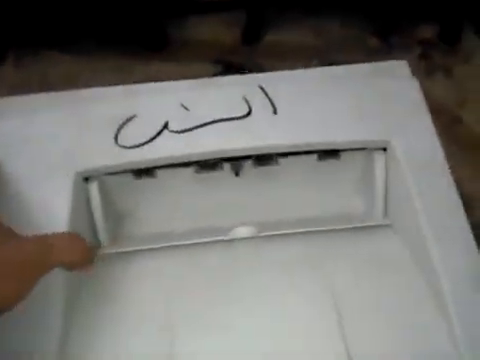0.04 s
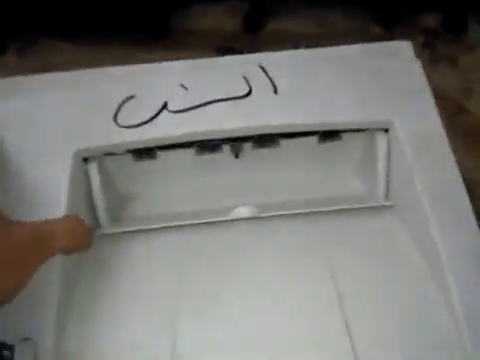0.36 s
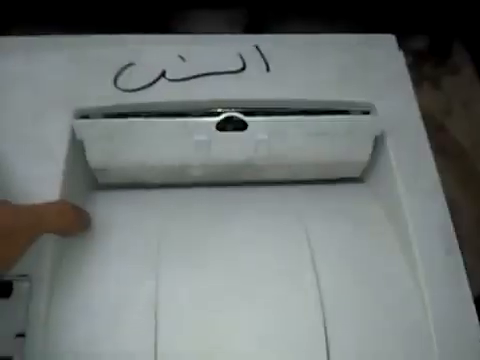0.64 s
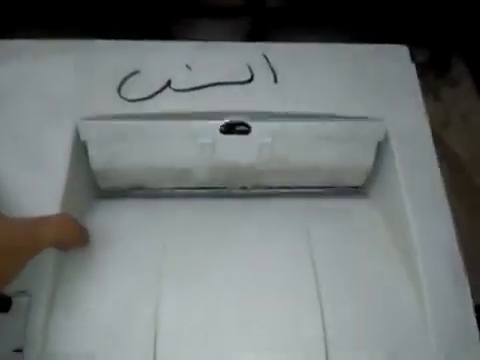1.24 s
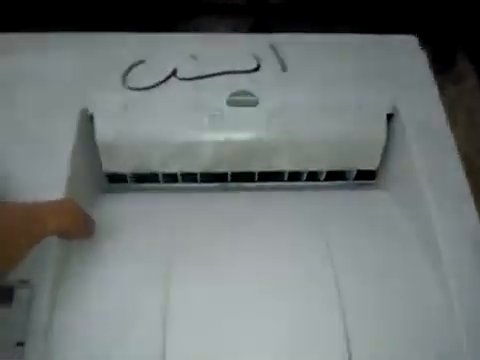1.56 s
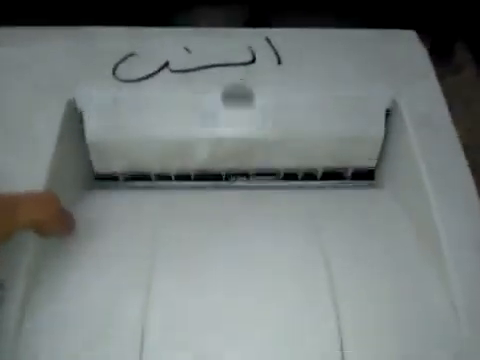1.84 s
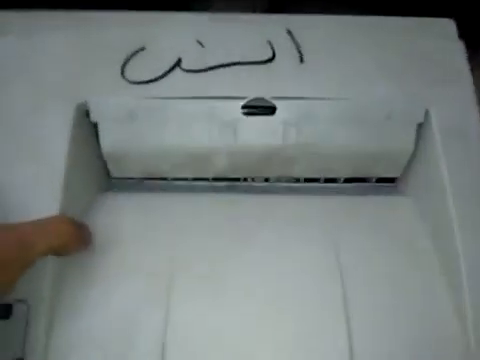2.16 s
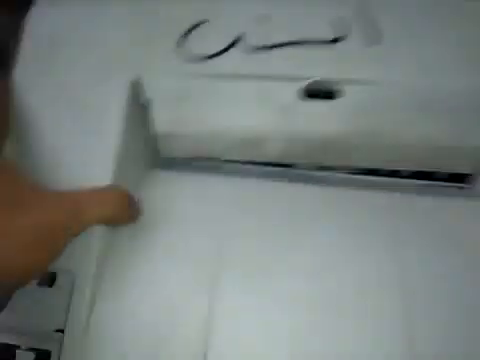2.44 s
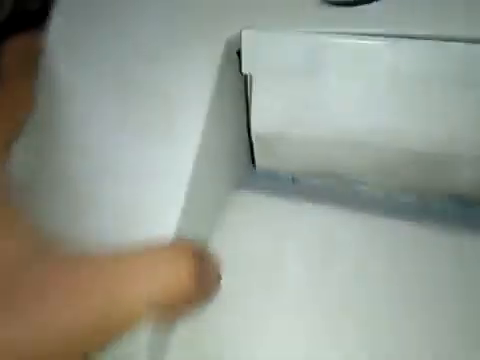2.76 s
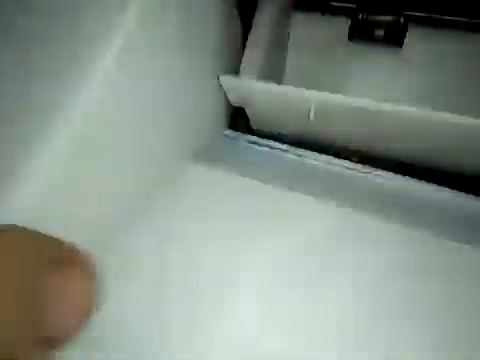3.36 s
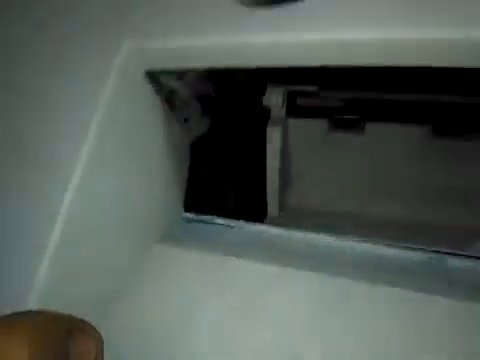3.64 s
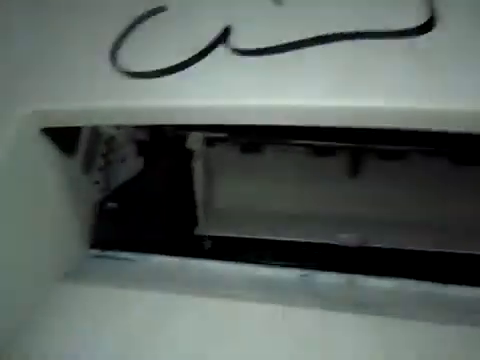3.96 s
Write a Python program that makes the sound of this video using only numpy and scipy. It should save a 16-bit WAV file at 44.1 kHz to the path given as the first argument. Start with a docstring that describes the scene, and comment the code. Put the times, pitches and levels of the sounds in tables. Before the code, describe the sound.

A loose plastic printer flap is worked by hand, close up in a small room. Faint scrapes and bumps come first, over a low handling rumble. From about 1 second it clicks, knocks and scrapes unevenly against the hollow casing, harder around 2 seconds. A loud rattling burst begins near 3.3 seconds. At 3.6 the flap snaps free with a thin ring, then drops inside, teeters and clatters to rest.

```python
"""A loose plastic printer flap is worked by hand, close to the microphone in a small room.
It starts with faint stick-slip scrapes and bumps over a handling rumble. From about one second it
knocks, clicks and scrapes harder on the casing, each point of contact colouring the shell differently.
Near 3.6 s it is forced free with a snap that leaves a thin ring, then drops inside, teeters and settles."""
import sys
import numpy as np
from scipy import signal
from scipy.fft import rfft, irfft, next_fast_len
from scipy.io import wavfile
from scipy.ndimage import uniform_filter1d, minimum_filter1d

SR = 44100
rng = np.random.default_rng(int(sys.argv[2]) if len(sys.argv) > 2 else 0)


def digitize_waveform(pressure):
    """Quantize a signal to 16-bit integers and store it at the path in sys.argv[1].

    Rows of a 2-D input are taken as channels; values are limited to [-1, 1].
    """
    field = np.atleast_2d(pressure).T
    bounded = np.clip(field, -1, 1)
    quanta = np.round(bounded * 32767).astype(np.int16)
    wavfile.write(sys.argv[1], SR, quanta)


N = 176400
TIME = np.arange(N) / SR
HIT_TIME = np.arange(SR // 3) / SR  # seconds into one contact

# The shell's four registers: thump, body, clack, tick. Each row: low and high edge in Hz, attack in
# seconds, multiplier on a knock's decay time, knock gain in dB, scrape gain in dB, room send in dB.
REGISTERS = [(30, 416, 0.0036, 1.4, -0.5, -2.5, -6), (324, 1935, 0.00073, 1.174, 0.5, -2.5, -11.5),
             (1568, 4870, 0.0015, 0.9, 2, -2.5, -13), (5450, 22000, 0.00021, 0.8, 1.5, 0, -23)]


def amp(db):
    """Decibels to gain."""
    return 10 ** (np.asarray(db) / 20)


def unit(x):
    """Scale to rms 1."""
    return x / np.sqrt(np.mean(x ** 2) + 1e-20)


def along(points, hz):
    """Read (Hz, value) points on a log axis."""
    freqs, values = np.transpose(points)
    return np.interp(np.log(hz + 1), np.log(freqs + 1), values)


def filtered(x, response):
    """Equalise x with a gain curve over frequency."""
    n = x.shape[-1]
    size = next_fast_len(n + SR // 10)
    return irfft(rfft(x, size) * response(np.fft.rfftfreq(size, 1 / SR)), size)[..., :n]


def noise(spectrum):
    """Noise of rms 1 with the given colour."""
    return unit(filtered(rng.standard_normal(N), lambda hz: amp(along(spectrum, hz))))


def add(track, start, x):
    """Mix x into the track at start seconds."""
    i = max(round(start * SR), 0)
    track[i:i + len(x)] += x[:max(N - i, 0)]


def noise_floor(level_db=-74.5):
    """A faint, steady, bass-heavy bed of noise."""
    # Each row: frequency in Hz, relative level in dB.
    colour = [(25, -6.5), (54, -4.5), (200, -9.5), (1330, -21), (2030, -23), (5400, -31), (14000, -28.5)]
    return amp(level_db) * noise(colour)


def handling_rumble():
    """Deep handling noise that swells and sinks."""
    # Each row: time in seconds, level in dB.
    fader = [(0.0, -85), (0.09, -57), (0.59, -71.5), (0.67, -97), (1.06, -48), (1.12, -73), (2.91, -53.5),
             (2.97, -72), (3.41, -45), (4.0, -65.5)]
    # Each row: frequency in Hz, relative level in dB.
    colour = [(12, -23), (25, 4), (42, -4.5), (60, 8), (110, -21.5), (400, -71.5)]
    return amp(np.interp(TIME, *np.transpose(fader))) * noise(colour)


def shell_modes(lo_hz, hi_hz, places=32, pitch_scatter=0.027, lift_scatter_db=2.5):
    """The shell's dense modes in one register, as coloured noise: one row per point of contact."""
    # The plastic's overall tone. Each row: frequency in Hz, relative level in dB.
    colour = [(25, -27), (45, -15), (72, 2), (115, -5), (154, -10.5), (193, 2), (320, -8.5), (450, -6),
              (750, -3), (1240, 6.5), (1700, -5.5), (3000, -10), (4270, -8), (5100, -9), (7230, -12.5),
              (9500, -12), (12000, -17), (14300, -47)]
    # Its resonances and one dip. Each row: centre in Hz, width in Hz, lift in dB.
    resonances = [(436, 19, 9), (642, 89, 5.5), (1360, 410, -9.5), (2125, 320, 3.5), (2765, 92, 7.5),
                  (3376, 240, 6), (4260, 700, 4), (5520, 150, 5)]
    shifts, lifts = rng.standard_normal((2, len(resonances), places, 1))

    def response(hz):
        lift_db = 0
        for (centre, width, db), shift, lift in zip(resonances, shifts, lifts):
            off_centre = 2 * (hz - centre * (1 + pitch_scatter * shift)) / width
            lift_db += (db + lift_scatter_db * lift) / (1 + off_centre ** 2)
        band = ((1 + (lo_hz / (hz + 1)) ** 8) * (1 + (hz / hi_hz) ** 8)) ** -.5
        return amp(along(colour, hz) + lift_db) * band
    return unit(filtered(rng.standard_normal((places, len(HIT_TIME))), response))


def shell_hit(modes, attack_s, t60, wall_max_s=0.0009, wall_gain=0.55):
    """The shell rings out from a random point of contact, coloured by a bounce off a nearby wall."""
    place, offset, path, polarity = rng.random(4)
    env = amp(-60 * HIT_TIME / t60) * (1 - np.exp(-HIT_TIME / attack_s))
    direct = np.roll(modes[int(place * len(modes))], -int(offset * len(HIT_TIME) / 2)) * env
    bounce = np.roll(direct, int(SR * wall_max_s * (1 + path) / 2))
    hit = direct + wall_gain * np.sign(polarity - .5) * bounce
    return hit * np.sqrt(np.sum(env ** 2) / np.sum(hit ** 2))


def stick_slip(jerks_per_s=1300, scatter_db=3.5):
    """The edge grips and lets go: randomly timed jerks of uneven size."""
    slips = rng.random(N) < jerks_per_s / SR
    sizes = amp(scatter_db * np.clip(rng.standard_normal(N), -2, 2))
    return slips * sizes * rng.choice([-1, 1], N)


def rubbing(modes, jerks, register, segments=140):
    """Jerks excite the shell; the point of contact wanders, so the colour keeps changing."""
    # A jerk's t60 in seconds, per register: the treble dies first.
    decays = [0.038, 0.044, 0.035, 0.02]
    # Exponent on a jerk's size, per register: only hard jerks tick.
    hardness = [0.9, 1.05, 1.3, 1.6]
    out, step = np.zeros(N), N // segments
    attack_s = REGISTERS[register][2]
    train = np.sign(jerks) * np.abs(jerks) ** hardness[register]
    for i in range(0, N, step):
        hit = shell_hit(modes, attack_s, decays[register])[:SR // 10]
        add(out, i / SR, signal.fftconvolve(train[i:i + step], hit))
    return unit(out)


def scrapes(modes, jerks, register, rise_s=0.012, fall_s=0.013, swell_share=0.067):
    """While the flap slides, the rubbing swells, holds and fades."""
    # Scrapes and loose chatter. Each row: start and end in seconds, then thump, body, clack and tick
    # levels in dB before the register's gain.
    slides = [(0.045, 0.386, -65, -73, -70, -76.5), (0.168, 0.276, -53, -53.5, -58, -67),
              (0.53, 0.566, -61, -70, -74, -81), (0.969, 1.166, -45.5, -39, -39, -74),
              (1.033, 1.083, -47, -37, -43, -45.5), (1.143, 1.24, -49.5, -52, -47.5, -53),
              (1.278, 1.48, -53.5, -51.5, -42.5, -51.5), (1.472, 1.503, -39.5, -35, -35, -37),
              (1.524, 1.813, -50, -53.5, -52.5, -59.5), (1.665, 1.708, -66, -39, -37.5, -37),
              (1.805, 1.867, -43, -49, -44, -44), (1.877, 1.95, -47.5, -47, -50, -50.5),
              (1.94, 1.976, -48, -35.5, -38, -40), (1.97, 2.038, -34, -25, -22.5, -31.5),
              (2.064, 2.114, -45.5, -52, -47.5, -60), (2.085, 2.264, -53, -55.5, -52.5, -82),
              (2.247, 2.323, -66, -40.5, -39, -46), (2.335, 2.405, -46, -42, -50, -72),
              (2.408, 2.727, -49.5, -59.5, -53.5, -71), (2.574, 2.621, -36.5, -39, -50, -44),
              (2.73, 2.77, -51, -51, -41.5, -39), (2.754, 2.896, -47, -57, -59, -73),
              (3.011, 3.256, -50.5, -59.5, -69, -73), (3.114, 3.123, -38.5, -46, -51, -40.5),
              (3.24, 3.273, -37.5, -37.5, -42, -49), (3.306, 3.37, -42, -47, -42, -48),
              (3.353, 3.397, -25, -27, -30, -40), (3.386, 3.495, -32.5, -29, -23, -24.5),
              (3.494, 3.541, -44, -26, -25, -27), (3.576, 3.595, -46, -54, -22.5, -32),
              (3.606, 3.679, -47, -36, -29.5, -33.5), (3.665, 3.793, -52.5, -57, -51, -83),
              (3.83, 3.904, -54, -37, -39.5, -37.5), (3.92, 4.004, -63, -50.5, -55, -77)]
    power = np.zeros(N)
    for start, end, *levels in slides:
        length = max(end - start, rise_s)
        t = TIME[:int(length * SR) + len(HIT_TIME)]
        swell_s = swell_share * length  # longer scrapes swell and fade more slowly
        fade_in = np.minimum(t / (rise_s + swell_s), 1)
        fade_out = np.exp(-np.maximum(t - length + swell_s, 0) / (fall_s + swell_s / 2))
        add(power, start, (fade_in * fade_out * amp(levels[register])) ** 2)
    return np.sqrt(power) * rubbing(modes, jerks, register)


def casing_thump(detune=0.059, scatter_db=2):
    """The low modes of the casing, a little different for each blow."""
    # Each row: pitch in Hz, relative level in dB, t60 in seconds.
    low_modes = [(70.3, -5.5, 0.13), (109, -5, 0.092), (184.8, -3, 0.07), (257, -3.5, 0.077)]
    out = np.zeros(len(HIT_TIME))
    for k, (hz, db, t60) in enumerate(low_modes):
        env = amp(db + scatter_db * rng.standard_normal() - 60 * HIT_TIME / t60)
        pitch = hz * (1 + detune * rng.standard_normal())
        out += (-1) ** k * env * np.sin(2 * np.pi * pitch * HIT_TIME)
    return out


def knock_ring(hz, t60, spread=0.0332, scatter_db=9, damping=1.38):
    """Three close modes, struck together and beating against each other."""
    detune, scatter = rng.standard_normal((2, 3, 1))
    pitches = hz * (1 + spread * (np.array([[-1], [0], [1]]) + detune / 3))
    env = amp(-60 * damping * HIT_TIME / t60) * (1 - np.exp(-HIT_TIME * hz / 2))
    cluster = env * np.sum(amp(scatter_db * scatter) * np.sin(2 * np.pi * pitches * HIT_TIME), axis=0)
    return cluster * np.linalg.norm(env) / np.linalg.norm(cluster)


def knocks(modes, register):
    """Each contact thumps the casing and excites the dense modes, with one ring standing out."""
    # Each row: start in seconds, thump, body, clack and tick levels in dB, ring pitch in Hz, ring level
    # in dB, base t60 in seconds. Levels are before the register's gain.
    contacts = [(0.084, -45, -66, -91, -78, 236, -65, 0.1), (0.525, -47, -57, -78, -80, 1107, -55, 0.06),
                (0.972, -46, -35.5, -53, -75, 856, -49, 0.066),
                (0.994, -62, -45, -27.5, -67.5, 4220, -26, 0.05),
                (1.003, -67, -50, -42, -68, 3415, -28, 0.068),
                (1.082, -58, -49, -30, -63, 3800, -32, 0.034),
                (1.094, -63, -46, -33.5, -62, 1985, -27.5, 0.051),
                (1.181, -40, -32, -54, -42, 1160, -34.5, 0.06),
                (1.186, -62, -29.5, -36, -36.5, 3230, -31.5, 0.063),
                (1.310, -62, -60, -33.5, -34, 4720, -35, 0.13),
                (1.324, -68, -37, -25, -24.5, 4420, -20.5, 0.031),
                (1.331, -58, -35, -21, -22, 4424, -18, 0.078),
                (1.344, -49, -34.5, -28.5, -41, 4550, -50.5, 0.13),
                (1.425, -67, -42.5, -34.5, -61, 4550, -40, 0.18),
                (1.466, -64, -24.5, -25.5, -31.5, 4170, -24, 0.066),
                (1.483, -66, -32, -48, -52, 595, -27, 0.081), (1.678, -57, -34, -28, -37, 4460, -53, 0.052),
                (1.794, -45, -36, -36, -58, 3790, -41, 0.086),
                (1.975, -28, -23.5, -23.5, -25.5, 4260, -24, 0.072),
                (1.983, -35, -40, -22.5, -27, 4290, -27.5, 0.17),
                (2.034, -38.5, -38, -25, -25, 4360, -32, 0.12),
                (2.202, -58, -64, -31.5, -45, 2040, -55.5, 0.074),
                (2.23, -49, -68, -31, -56, 3010, -43, 0.19),
                (2.264, -21.5, -22, -26.5, -53.5, 436, -14.5, 0.059),
                (2.272, -37, -28, -46, -54, 1500, -27, 0.085),
                (2.294, -54, -52, -31, -37.5, 3490, -36, 0.073),
                (2.383, -50, -43, -26.5, -41, 4530, -30, 0.053),
                (2.468, -50, -40.5, -40.5, -84, 1937, -35.5, 0.042),
                (2.55, -43, -42, -49.5, -54, 845, -38, 0.13),
                (2.592, -43, -24.5, -36.5, -55, 442, -19.5, 0.054),
                (2.598, -36, -30, -33, -39, 432, -24, 0.072),
                (2.678, -65, -50, -38.5, -50, 4020, -47, 0.11),
                (2.725, -38, -26.5, -43, -38.5, 840, -29, 0.073),
                (2.753, -33, -38, -35.5, -42, 3860, -31, 0.047),
                (2.846, -57, -38, -28.5, -39, 1750, -36.5, 0.038),
                (3.073, -67.5, -46, -59, -80.5, 490, -32, 0.048),
                (3.109, -34, -39, -36.5, -35.5, 195, -52, 0.09),
                (3.256, -49, -43, -39, -32.5, 6050, -57, 0.12),
                (3.268, -30, -63, -31, -31.5, 4360, -52, 0.071),
                (3.358, -26, -20.5, -28, -30.5, 78, -17, 0.076),
                (3.374, -40, -36, -49, -40.5, 436, -31, 0.095),
                (3.406, -24, -29, -28, -26, 5430, -28, 0.049), (3.428, -26, -23, -39, -36, 654, -20, 0.075),
                (3.444, -30, -26, -31, -21, 115, -28, 0.084),
                (3.472, -31, -20.5, -23, -25.5, 4230, -23, 0.063),
                (3.493, -49, -48, -15.5, -26, 1333, -6.5, 0.034),
                (3.523, -40, -26, -39, -42, 1167, -22.5, 0.12), (3.573, -43, -25, -16, -21, 3350, -24, 0.1),
                (3.583, -72, -54, -26.5, -20.5, 4640, -23, 0.14),
                (3.601, -39, -27.5, -17, -41, 3880, -18.5, 0.082),
                (3.641, -37, -49, -29.5, -27, 5900, -38, 0.099),
                (3.696, -50, -39.5, -33.5, -71.5, 2205, -41, 0.096),
                (3.821, -67, -33, -18.5, -23.5, 3390, -24.5, 0.069),
                (3.826, -58, -43, -20.5, -21, 3330, -44.5, 0.056),
                (3.853, -57, -45, -18.5, -23.5, 3990, -26, 0.062),
                (3.871, -68, -26.5, -20, -45, 4360, -27, 0.045),
                (3.894, -46.5, -37, -33, -39.5, 1725, -37, 0.15),
                (3.956, -66, -56, -46, -69, 2050, -36.5, 0.046),
                (3.967, -49, -55, -44.5, -43.5, 4640, -51, 0.052)]
    lo_hz, hi_hz, attack_s, decay_scale = REGISTERS[register][:4]
    out = np.zeros(N)
    for start, *levels, ring_hz, ring_db, t60 in contacts:
        hit = shell_hit(modes, attack_s, t60 * decay_scale)
        if register == 0:
            hit = 0.16 * hit + casing_thump()
        add(out, start, amp(levels[register]) * hit)
        if lo_hz <= ring_hz < hi_hz:
            add(out, start, amp(ring_db) * knock_ring(ring_hz, t60))
    return out


def room_tail(x, positions=16):
    """The room's diffuse reverb, crossfading from tail to tail as flap and microphone move."""
    # Each row: frequency in Hz, t60 in seconds.
    decays = [(100, 0.2), (1000, 0.29), (4000, 0.17), (12000, 0.17)]
    out, step = np.zeros(N), N // positions
    for i in range(0, N, step):
        hz, t, spectra = signal.stft(rng.standard_normal(len(HIT_TIME)), SR, nperseg=256)
        tail = signal.istft(spectra * amp(-60 * t / along(decays, hz)[:, None]), SR, nperseg=256)[1]
        tail = np.pad(tail, (SR // 200, 0))  # 5 ms pre-delay
        first = max(i - step, 0)
        part = x[first:i + step]
        crossfade = np.cos(np.pi / 2 * (first + np.arange(len(part)) - i) / step)
        add(out, first / SR, signal.fftconvolve(part * crossfade, tail / np.linalg.norm(tail)))
    return out


def top_brightness(x, corner_hz=9060):
    """The highest treble brightens briefly around 1.7 s, dulls, then opens up by 3.5 s."""
    # Each row: time in seconds, treble gain in dB.
    fader = [(1.1, -44), (1.33, -28), (1.7, -15.5), (2.1, -33), (3.5, -7.5)]
    air = filtered(x, lambda hz: 1 - 1 / (1 + (hz / corner_hz) ** 20))
    return x + (amp(np.interp(TIME, *np.transpose(fader))) - 1) * air


def catch_clicks(band_hz=(8300, 13800), t60=0.016):
    """The flap's catch slips over an edge with a very short, bright crack."""
    # Each row: start in seconds, level in dB.
    slips = [(1.331, -30), (2.381, -50.5), (2.741, -45), (2.847, -41.5), (3.109, -45.5), (3.572, -23.5)]
    out = np.zeros(N)
    band = signal.butter(2, band_hz, "bandpass", fs=SR, output="sos")
    for start, db in slips:
        crack = unit(signal.sosfilt(band, rng.standard_normal(len(HIT_TIME))))
        add(out, start, crack * amp(db - 60 * HIT_TIME / t60))
    return out


def spring_ring():
    """The snap that frees the flap leaves a springy part ringing thinly."""
    # Each row: start in seconds, level in dB.
    snaps = [(3.573, -37)]
    # Each row: pitch in Hz, relative level in dB, t60 in seconds.
    partials = [(2210, -6, 0.25), (3892, -8, 0.26), (4140, 3, 0.57), (9884, -13, 0.66)]
    out, t = np.zeros(N), TIME[:SR]
    for start, snap_db in snaps:
        for hz, db, t60 in partials:
            add(out, start, amp(snap_db + db - 60 * t / t60) * np.sin(2 * np.pi * hz * t))
    return out


def teeter(pitch_hz=1236, peak_s=0.002):
    """The freed flap teeters on one edge: soft hollow taps, ever closer together."""
    # Each row: start in seconds, level in dB.
    taps = [(3.733, -35), (3.764, -42), (3.787, -40), (3.803, -41)]
    out, age = np.zeros(N), HIT_TIME / peak_s
    tap = (age * np.exp(1 - age)) ** 2 * np.sin(2 * np.pi * pitch_hz * HIT_TIME)
    for start, db in taps:
        add(out, start, amp(db) * tap)
    return out


def stereo_side(mid, flickers_per_s=440):
    """A flickering side signal that widens the treble."""
    # Each row: frequency in Hz, side level against the mid in dB.
    width = [(100, -45), (2000, -42), (4000, -29.5), (8000, -8.5), (13000, -12)]
    flicker = unit(np.interp(TIME * flickers_per_s, np.arange(N), rng.standard_normal(N)))
    return filtered(mid * flicker, lambda hz: amp(along(width, hz)))


def scene():
    """Flap, room, handling rumble and noise floor; nearly mono, wider in the treble."""
    jerks = stick_slip()
    mid = spring_ring() + teeter()
    for register, (lo_hz, hi_hz, _, _, knock_db, scrape_db, room_db) in enumerate(REGISTERS):
        modes = shell_modes(lo_hz, hi_hz)
        flap = amp(knock_db) * knocks(modes, register)
        flap += amp(scrape_db) * scrapes(modes, jerks, register)
        mid += flap + amp(room_db) * room_tail(flap)
    mid = top_brightness(mid) + catch_clicks() + noise_floor() + handling_rumble()
    side = stereo_side(mid) + amp(-4.5) * noise_floor()
    return np.array([mid + side, mid - side])


def record(dry):
    """Limit the highest peaks, then cut the deep bass and the very top."""
    ceiling, low_cut_hz, top_hz = 0.44, 31, 14400
    needed = ceiling / np.maximum(np.abs(dry).max(axis=0), ceiling)
    gain = uniform_filter1d(minimum_filter1d(needed, size=129), size=129)
    return filtered(dry * gain, lambda hz: (hz < top_hz) / np.sqrt(1 + (low_cut_hz / (hz + 1)) ** 10))


dry = scene()
out = record(dry)
digitize_waveform(out)
```